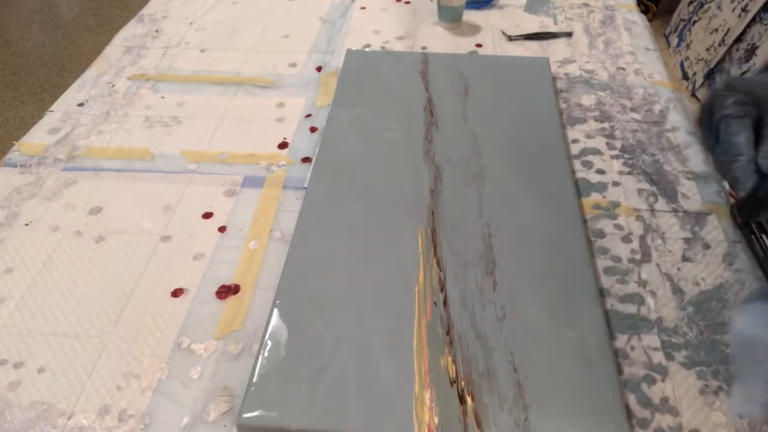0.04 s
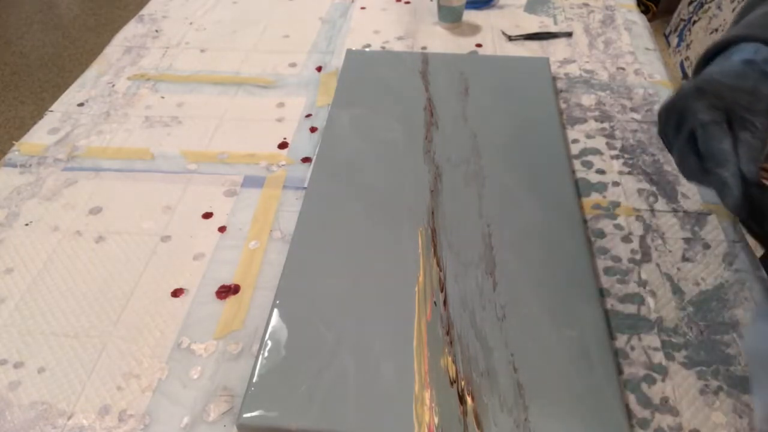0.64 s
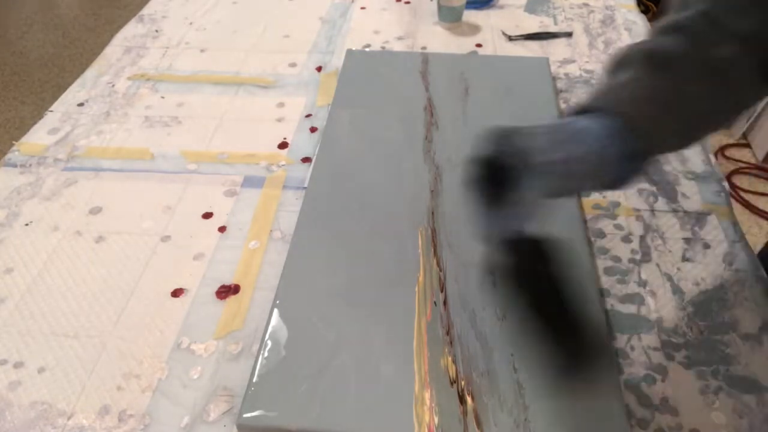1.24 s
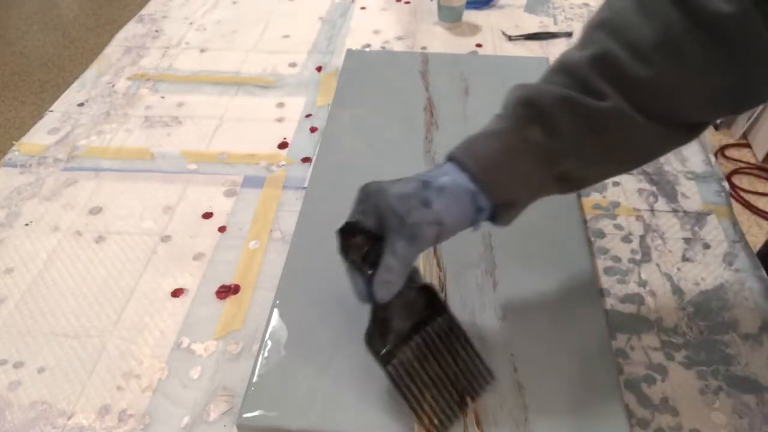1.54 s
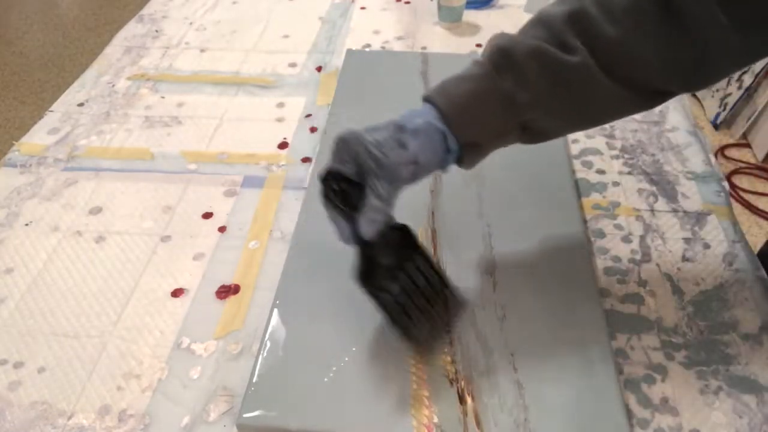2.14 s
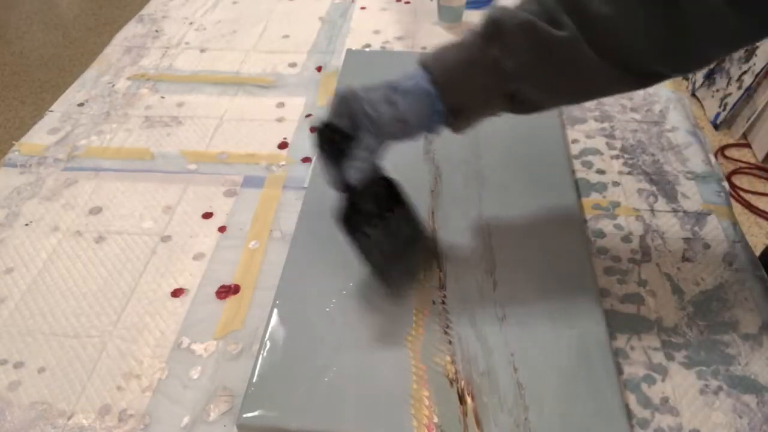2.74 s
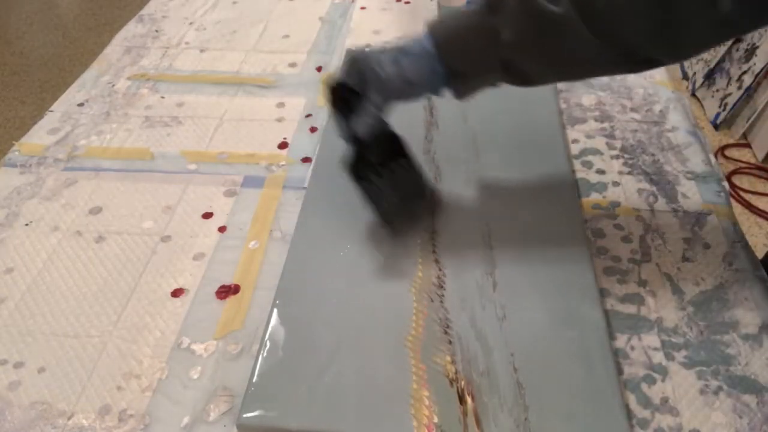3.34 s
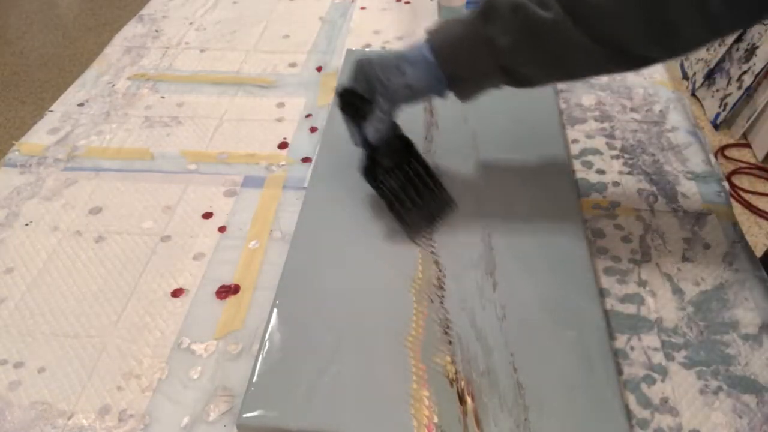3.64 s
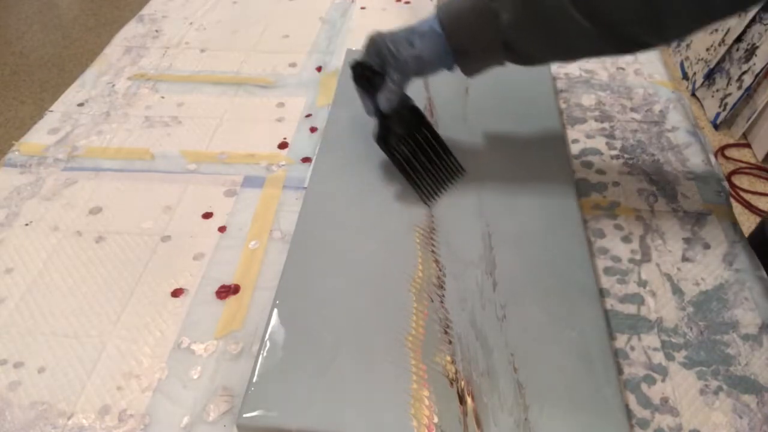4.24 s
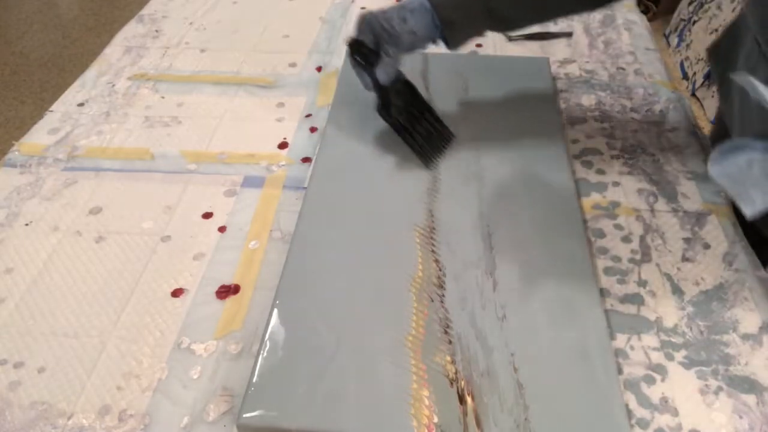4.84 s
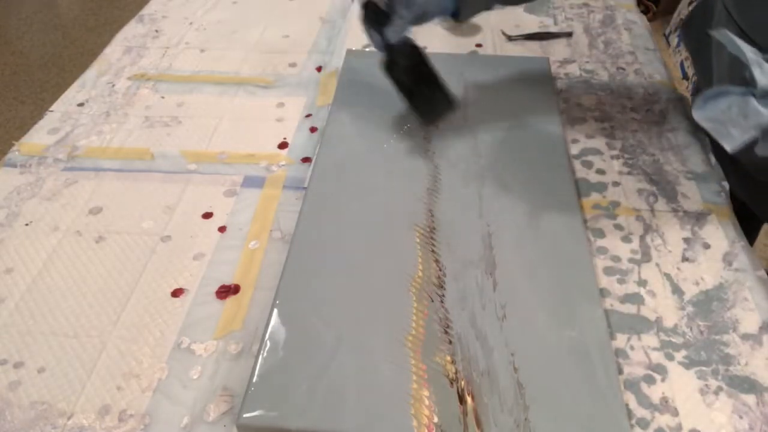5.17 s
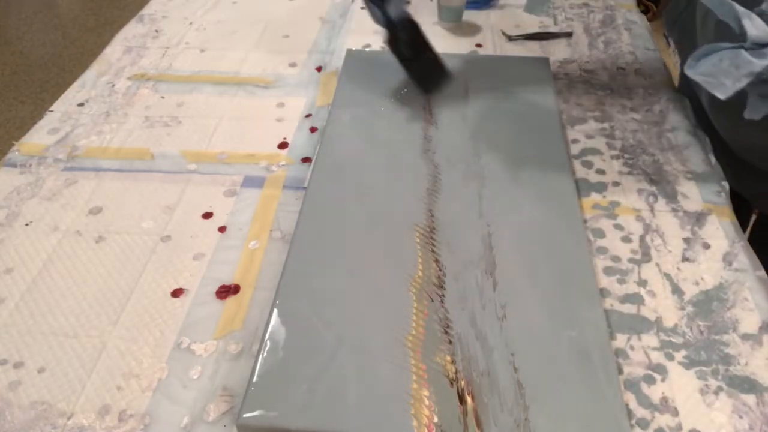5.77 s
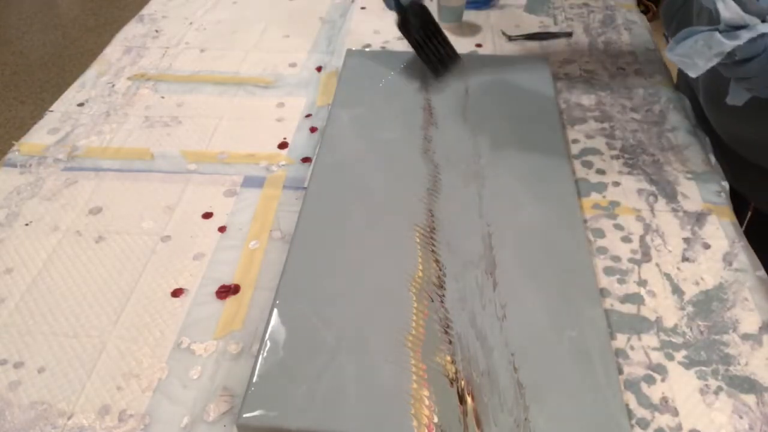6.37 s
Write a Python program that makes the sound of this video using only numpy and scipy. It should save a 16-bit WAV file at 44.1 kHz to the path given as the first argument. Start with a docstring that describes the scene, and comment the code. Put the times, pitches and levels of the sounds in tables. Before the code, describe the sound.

For the first 1.4 seconds a sleeve and glove rustle faintly, with small clicks of fingers gripping a plastic hair pick, the sharpest near 0.9 seconds. At about 1.6 seconds the pick lands on a stretched canvas covered in wet paint and scrapes across it, its teeth catching and snapping several times. Seven more strokes follow evenly, at about 2.3, 2.9, 3.6, 4.2, 4.8, 5.4 and 6.0 seconds. Each lasts roughly a third of a second: a light tick and a soft, low canvas boom, then a swelling, grainy rasp with fine wet crackles that stops quickly. The strokes at 3.6 and 4.8 seconds land with a firmer knock. Later strokes grow duller, and the last presses a little harder and snags twice. Everything is heard close up in a small room, with slight reverberation and a faint, low background noise.

```python
"""A sleeve and glove rustle, with small clicks as a plastic hair pick is gripped.
Then the pick is drawn eight times through wet paint on a stretched canvas, in a small quiet room.
Each stroke lands with a tick and a soft canvas boom; the tines rasp over the weave and sometimes snag.
The strokes work toward the far end of the canvas, which shifts the weights of the resonances."""
import sys
import numpy as np
from scipy import signal
from scipy.fft import rfft, irfft, next_fast_len
from scipy.io import wavfile
from scipy.ndimage import map_coordinates

SR = 44100
rng = np.random.default_rng(int(sys.argv[2]) if len(sys.argv) > 2 else 0)


def persist_wave(psi):
    """Save psi, clipped to +-1, as 16-bit WAV."""
    counts = np.round(np.clip(psi, -1, 1) * 32767).astype(np.int16)
    wavfile.write(sys.argv[1], SR, np.atleast_2d(counts).T)


N = 282681
TIME = np.arange(N) / SR
FFT_SIZE = 2 * next_fast_len(N // 2 + SR // 2)
HZ = np.maximum(np.arange(FFT_SIZE // 2 + 1) * SR / FFT_SIZE, 1)


# Strokes, levels relative per column: landing t/s, rest/s, pressure build/s, landing to lift/s,
# drag/dB, treble/dB, tick/dB, knock/dB, drum/dB, delay until the canvas gives/s
STROKES = [ (1.62, 0.017, 0.11, .308, -45, -3, -36.5, -51, -48.5, 0.0021),
           (2.31, 0.0022, 0.23, 0.29, -43, -2.5, -32.5, -61, -51, 0.007),
           (2.941, 0.0077, 0.13, 0.28, -43.5, -4, -33.5, -54, -51.5, 0.0083),
           (3.5715, 0.0056, 0.15, 0.29, -42.5, -8, -36, -31, -48, 0.0104),
           (4.208, 0.0017, 0.21, 0.27, -43, -7, -41.5, -41, -49, 0.012),
           (4.8034, 0.016, 0.12, .24, -43.5, -8.5, -40, -33.5, -41.5, .0039),
           (5.39, 0.0066, 0.2, 0.25, -43.5, -7, -39.5, -55, -54.5, 0.017),
           (5.969, 0.0098, 0.17, 0.24, -39.5, -12.6, -39.5, -48, -45.5, 0.02), ]

def stroke_gains(rest_pressure=0.11, press_exponent=0.91, light_touch_db=1.5,
                 lift_fade_db_per_s=400, lift_dull_db_per_s=63):
    """Drag and treble gains: the pick rests, bears down, holds and lifts. A light touch is brighter."""
    drag, treble = np.zeros(N), np.ones(N)
    for land_s, rest_s, build_s, lift_s, drag_db, treble_db, *_ in STROKES:
        age = TIME - land_s
        pressure = np.maximum(np.clip((age - rest_s) / build_s, 0, 1) ** press_exponent, rest_pressure)
        lifted_s = np.maximum(age - lift_s, 0)
        drag += (age >= 0) * pressure * from_db(drag_db - lift_fade_db_per_s * lifted_s)
        tilt_db = treble_db + light_touch_db * (1 - pressure) - lift_dull_db_per_s * lifted_s
        treble = np.where(age >= 0, from_db(tilt_db), treble)
    return drag, treble


def rasp(drag, treble, gain_db, treble_db, chatter_db, chatter_per_s, crackle_db, split_hz):
    """Tines slip over the threads in uneven bunches; wet paint adds sparse bright crackles."""
    friction = slips(per_s=3000, spread_db=1.0, hiss=0.49)
    chatter = rms_one(from_db(chatter_db * drift(chatter_per_s)))
    force = drag * friction * chatter
    lows = signal.sosfiltfilt(signal.butter(2, split_hz, fs=SR, output="sos"), force)
    highs = (force - lows) * treble * from_db(treble_db)
    paint_pops = slips(per_s=450, spread_db=4.5, hiss=0)
    crackle = rms_one(filtered(paint_pops, resonance(hz=4170, width_hz=4100)))
    return from_db(gain_db) * body(lows + highs) + from_db(crackle_db) * crackle * drag * treble


def landings(tick_gain_db, tick_s, knock_gain_db, knock_s, knock_cutoff_hz):
    """The tine tips tick almost together; the weight of the pick knocks on the canvas."""
    ticks = sum(from_db(db + tick_gain_db) * burst(at_s, tick_s) for at_s, *_, db, _, _, _ in STROKES)
    knocks = sum(from_db(db + knock_gain_db) * burst(at_s, knock_s) for at_s, *_, db, _, _ in STROKES)
    dull_knocks = signal.lfilter(*signal.butter(2, knock_cutoff_hz, fs=SR), knocks)
    return body(ticks + dull_knocks)


# Pick-on-canvas resonances: f/Hz, width/Hz, near-end level/dB, middle level/dB, far-end level/dB
BODY_RESONANCES = [(299, 153, -12.5, -13.5, -17.5), (491, 214, -7.5, -14, -20), (676, 114, 4.5, -1.5, -7.5),
                   (771, 246, -12, -2.5, -5), (973, 159, -8.5, -3.5, 0), (1145, 180, -2.5, -4, -1.5),
                   (1580, 580, -22, -11.5, -18), (1890, 740, -6.5, -9, -12),
                   (3010, 1130, -11, -12.5, -13.5), (3900, 430, -20.5, -14.5, -10.5),
                   (4730, 1000, -39, -18, -11.5), (5910, 1320, -17, -16.5, -17.5),
                   (7380, 700, -87, -14.5, -8), (8900, 2250, -30, -32, -19.5),
                   (9870, 650, -26.5, -21.5, -41), (11200, 1000, -36, -28.5, -21),
                   (12200, 500, -25, -25, -39), (13600, 6400, -33.5, -29, -25.5),
                   (14100, 1500, -31, -35, -19)]
# Contact point: t/s, place (0 near end, 1 middle, 2 far end)
PICK_PATH = [(1.9, 0.48), (2.5, 0.51), (3.1, 0.73), (3.7, 1.28), (4.4, 1.31), (5.0, 1.63), (5.55, 1.44),
             (6.1, 1.97)]

def body(force):
    """Pick and canvas ring with weights that follow the contact point."""
    table = np.array(BODY_RESONANCES)
    shapes = np.array([resonance(hz, width_hz) ** 2 for hz, width_hz in table[:, :2]])
    place = np.interp(TIME, *np.transpose(PICK_PATH))
    out = 0
    for zone, weights_db in enumerate(table[:, 2:].T):
        power = from_db(weights_db) ** 2 @ shapes
        share = np.maximum(1 - np.abs(place - zone), 0)
        out += filtered(force * share, np.sqrt(power / power.mean()))
    return out


# Membrane modes: f/Hz, relative level/dB, t60/s
CANVAS_MODES = [(69.5, -10.5, 0.17), (113, -2.5, 0.035), (138.1, -2.5, 0.28), (173.7, -8, 0.054),
                (280.7, -12, 0.26)]

def canvas_drum(drag, push_s, settle_db, settle_s, rub_db, highpass_hz):
    """The canvas booms as the pick pushes in and settles unevenly; the drag keeps it humming."""
    force = from_db(rub_db) * drag * rng.standard_normal(N)
    for land_s, *_, drum_db, delay_s in STROKES:
        push = np.exp(-((TIME - land_s - delay_s) / push_s) ** 2)
        settling = from_db(settle_db) * burst(land_s + delay_s, settle_s)
        force += from_db(drum_db) * (2 * push / push.sum() + settling)
    boom = 0
    for k, (hz, db, t60_s) in enumerate(CANVAS_MODES):
        radius, angle = from_db(-60 / (t60_s * SR)), 2 * np.pi * hz / SR
        poles = [1, -2 * radius * np.cos(angle), radius ** 2]
        mode = signal.lfilter([0, np.sin(angle)], poles, force + 1e-18)
        boom += (-1) ** k * from_db(db) * mode   # opposed neighbours: swells over a few cycles
    # air slips round the open frame and cancels the lowest bass
    return signal.sosfilt(signal.butter(2, highpass_hz, "high", fs=SR, output="sos"), boom)


# Tines catching and snapping free: t/s, peak level/dB, f/Hz, width/Hz
TINE_SNAGS = [(1.6675, -31.5, 3150, 7360), (1.6925, -36, 3000, 4866), (1.714, -35, 3300, 2000),
              (1.753, -42, 3000, 4500), (1.882, -33, 4000, 6000), (2.343, -44, 1800, 4000),
              (2.974, -44, 1210, 2000), (5.425, -57, 1500, 3000), (6.013, -45, 1000, 1200),
              (6.064, -40, 990, 1190)]
# Fingers gripping the pick: t/s, peak level/dB, f/Hz, width/Hz
GRIP_CLICKS = [(0.041, -48, 12800, 5940), (.172, -49.5, 4570, 3500), (0.1866, -48.5, 4230, 3460),
               (0.6082, -64, 1480, 3960), (.7015, -57, 1680, 2000), (0.9035, -45, 5900, 5500),
               (.9108, -35, 5040, 4750), (.935, -42, 4400, 3600), (1.3555, -44.5, 1800, 4000)]

def plastic_clicks(clicks, decay_s):
    """Each short contact rings one broad, steep-sided resonance of the plastic."""
    out = 0
    for at_s, peak_db, hz, width_hz in clicks:
        b, a = signal.iirpeak(hz, hz / width_hz, fs=SR)
        contact = burst(at_s, decay_s) + 1e-18
        ring = signal.lfilter(b, a, signal.lfilter(b, a, contact))
        out += from_db(peak_db) * ring / np.abs(ring).max()
    return out


# Arm movements, levels relative: peak t/s, swell/s, fade/s, sleeve level/dB, glove level/dB
BRUSHES = [ (.02, .02, 0.046, -71, -69.5), (.185, 0.037, .025, -66, -69), (.365, 0.12, 0.012, -69.5, -77.5),
           (.565, 0.026, 0.042, -65, -61.5), (0.606, 0.0093, 0.0082, -57, -68),
           (.71, 0.013, 0.027, -63, -72), (.83, 0.046, 0.16, -70.5, -68.5),
           (1.035, 0.026, .036, -79, -60.5), (1.18, 0.059, 0.054, -69, -64), (1.359, 0.014, .012, -61, -68),
           (5.28, 0.12, 0.14, -74.5, -86), ]
# Sleeve rubbing spectrum: f/Hz, relative level/dB
SLEEVE_SPECTRUM = [(150, -43), (500, 0), (1500, -3), (4000, -9), (8000, -17.5), (16000, -24)]
# Glove rubbing spectrum: f/Hz, relative level/dB
GLOVE_SPECTRUM = [(1500, -18.5), (3200, -6.5), (4900, -2.5), (6500, -6), (9000, -9), (13000, -10),
                  (16000, -11)]

def rustle(sleeve_gain_db, glove_gain_db, flutter_db, flutter_per_s, reach_end_s):
    """Soft sleeve and brighter glove brush in swells, over faint steady rubbing during the reach."""
    reach_db = [-77.5, -76.5]   # sleeve, glove
    power = np.outer(from_db(reach_db) ** 2, TIME < reach_end_s)
    for peak_s, swell_s, fade_s, *levels_db in BRUSHES:
        bell = np.exp(-((TIME - peak_s) / np.where(TIME < peak_s, swell_s, fade_s)) ** 2)
        power += np.outer(from_db(levels_db) ** 2, bell)
    materials = (sleeve_gain_db, SLEEVE_SPECTRUM), (glove_gain_db, GLOVE_SPECTRUM)
    out = 0
    for envelope, (gain_db, spectrum) in zip(np.sqrt(power), materials):
        grains = slips(per_s=2500, spread_db=2.5, hiss=0.79) * from_db(flutter_db * drift(flutter_per_s))
        out += from_db(gain_db) * envelope * rms_one(filtered(grains, colour(spectrum)))
    return out


def near_echoes(x, echo_db, lag_spread, count=4):
    """Reflections off paint, hand and table ripple the spectrum; their lags wander at random."""
    out = x.copy()
    for lag_s in np.geomspace(0.0007, 0.0037, count):
        lag_samples = lag_s * SR * (1 + lag_spread * drift(per_s=2))
        out += from_db(echo_db) * map_coordinates(x, [np.arange(N) - lag_samples], order=3)
    return out / np.sqrt(1 + count * from_db(echo_db) ** 2)


# Room decay: f/Hz, t60/s, level/dB
REVERB_BANDS = [(150, 0.84, -9.5), (590, 0.44, -14), (1900, 0.48, -12.5), (3960, 0.41, -10.5),
                (7500, 0.48, -20)]

def reverb(x, predelay_s):
    """Diffuse reflections that last longest in the bass."""
    age = TIME[:SR * 3 // 4]
    log_centres = np.log([hz for hz, *_ in REVERB_BANDS])
    noise, response = rng.standard_normal(len(age)), 0
    for (_, t60_s, db), selector in zip(REVERB_BANDS, np.eye(len(REVERB_BANDS))):
        tail = noise * from_db(-60 * age / t60_s) * (age > predelay_s)
        band = np.interp(np.log(HZ), log_centres, selector)
        response += from_db(db) * band * rfft(tail / np.linalg.norm(tail), FFT_SIZE)
    return irfft(rfft(x, FFT_SIZE) * response)[:N]


# Background noise spectrum: f/Hz, relative level/dB
ROOM_TONE_SPECTRUM = [(20, -16), (40, -8.5), (70, -0.5), (110, -7), (190, -9), (270, -7), (480, -10),
                      (900, -15), (1800, -19.5), (3500, -23.5), (6000, -25), (15800, -35)]

def room_tone(rms_db):
    """Steady, bass-heavy noise of the quiet room."""
    return from_db(rms_db) * rms_one(filtered(rng.standard_normal(N), colour(ROOM_TONE_SPECTRUM)))


def slips(per_s, spread_db, hiss):
    """Tiny random slips of uneven size over a smooth hiss; unit rms."""
    sizes = from_db(spread_db * np.minimum(rng.exponential(1, N), 4)) * rng.choice([-1, 1], N)
    impulses = sizes * (rng.random(N) < per_s / SR)
    return rms_one(rms_one(impulses) + hiss * rng.standard_normal(N))


def burst(at_s, decay_s):
    """A decaying cluster of contacts; unit energy."""
    age, start, out = TIME[:SR // 5], int(at_s * SR), np.zeros(N)
    cluster = rng.standard_normal(len(age)) * np.exp(-age / decay_s)
    out[start:start + len(age)] = cluster / np.linalg.norm(cluster)
    return out


def drift(per_s):
    """Glides through `per_s` random values a second; unit spread."""
    return np.interp(TIME * per_s, np.arange(N), rng.standard_normal(N)) * np.sqrt(3 / 2)


def resonance(hz, width_hz):
    """Gain curve of a steep-sided resonance; unit peak."""
    return 1 / (1 + ((HZ ** 2 - hz ** 2) / (HZ * width_hz)) ** 2)


def colour(points):
    """Gain curve through (f/Hz, level/dB) points."""
    hz, db = np.transpose(points)
    return from_db(np.interp(np.log(HZ), np.log(hz), db))


def filtered(x, gain):
    """Minimum-phase filter with the given gain curve."""
    cepstrum = irfft(np.log(gain + 1e-6))
    cepstrum[1:FFT_SIZE // 2] *= 2
    cepstrum[FFT_SIZE // 2 + 1:] = 0
    return irfft(rfft(x, FFT_SIZE) * np.exp(rfft(cepstrum)))[:N]


def from_db(db):
    """Decibels to gain."""
    return 10 ** (np.asarray(db) / 20)


def rms_one(x):
    """Scale to unit rms."""
    return x / np.sqrt(np.mean(x ** 2) + 1e-20)


def scene():
    """Strokes and handling in the room, over its steady tone; mono."""
    drag, treble = stroke_gains()
    close = rasp(drag, treble, gain_db=2.0, treble_db=4.0, chatter_db=-1.0, chatter_per_s=360,
                 crackle_db=-9.0, split_hz=2530)
    close += landings(tick_gain_db=11.5, tick_s=0.0047,
                      knock_gain_db=14.0, knock_s=0.0045, knock_cutoff_hz=1120)
    close += plastic_clicks(TINE_SNAGS, decay_s=0.0015) + plastic_clicks(GRIP_CLICKS, decay_s=0.0008)
    close += rustle(sleeve_gain_db=-1, glove_gain_db=0.5, flutter_db=2.0, flutter_per_s=68.8,
                    reach_end_s=1.37)
    close = near_echoes(close, echo_db=-16, lag_spread=0.087)
    close += canvas_drum(drag, push_s=0.0016, settle_db=1.0, settle_s=0.047, rub_db=-46.5, highpass_hz=65)
    background = room_tone(rms_db=-68.5)
    return (close + reverb(close, predelay_s=0.0062) + background)[None]


def record(dry):
    """Steep low-pass on the top treble."""
    cutoff_hz = 15900
    return signal.sosfilt(signal.ellip(12, 0.1, 80, cutoff_hz, fs=SR, output="sos"), dry)


dry = scene()
out = record(dry)
persist_wave(out)
```